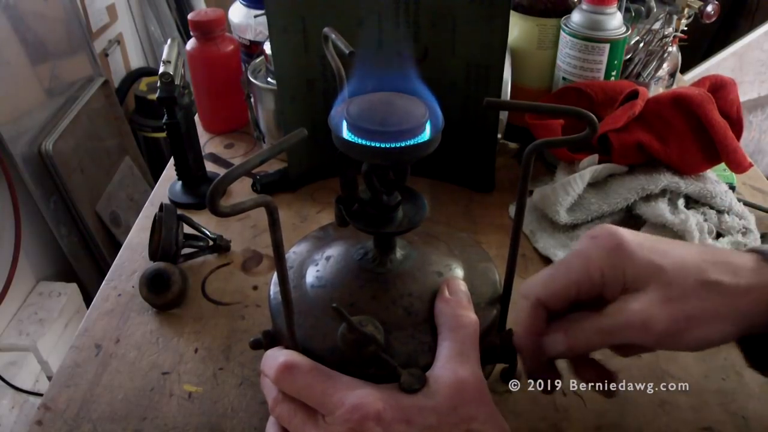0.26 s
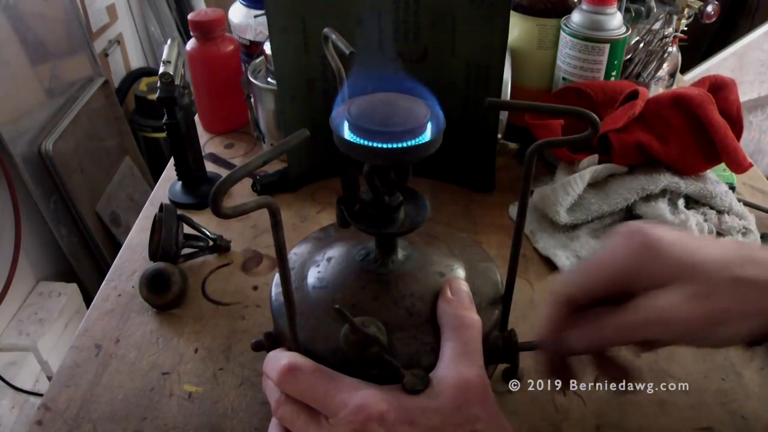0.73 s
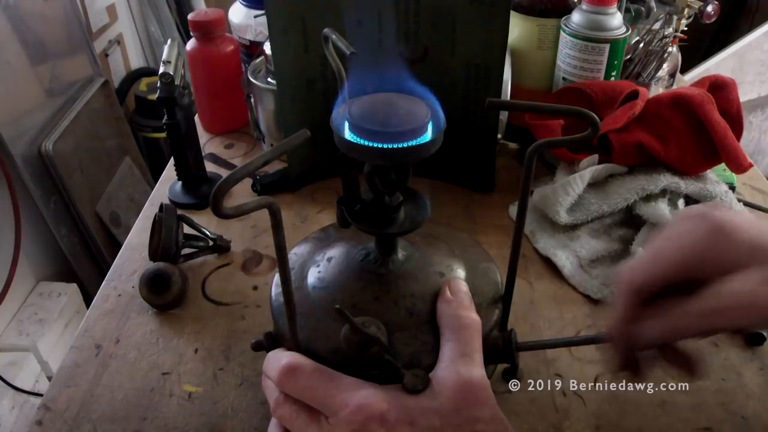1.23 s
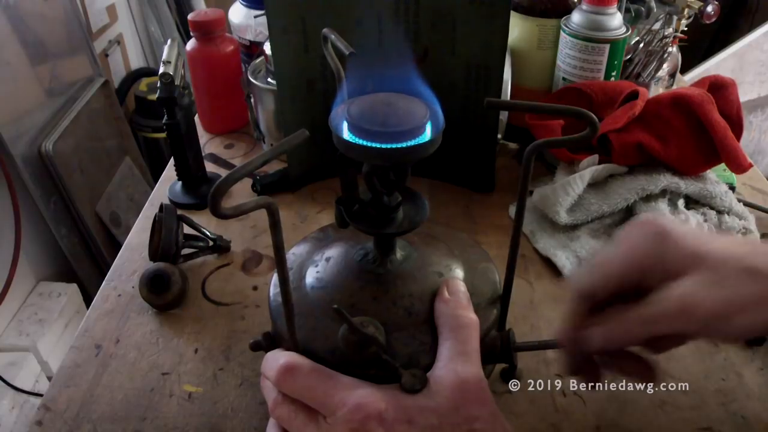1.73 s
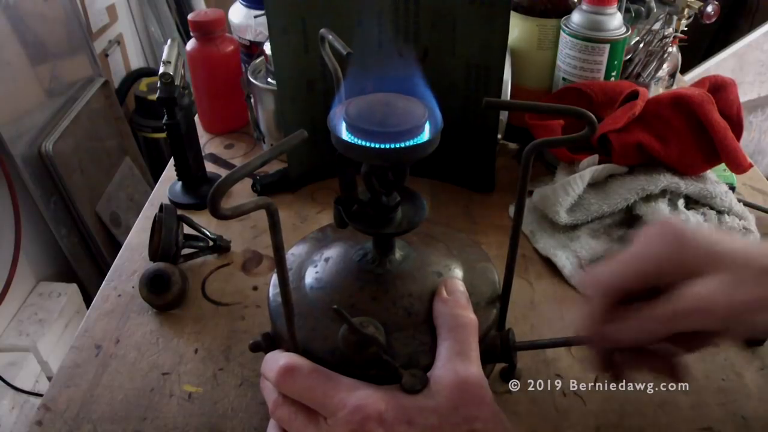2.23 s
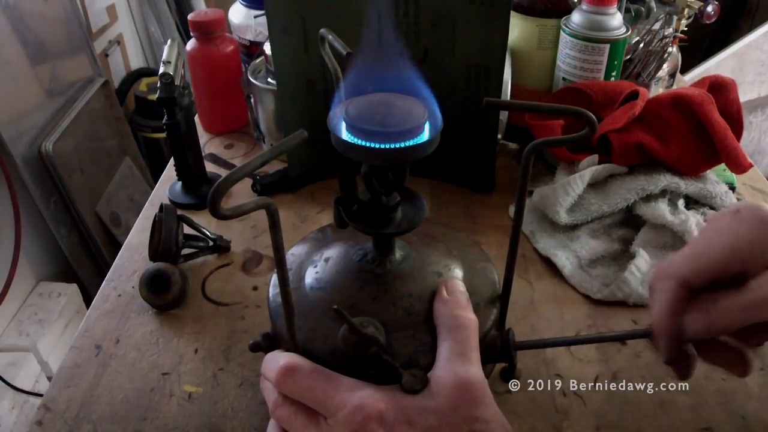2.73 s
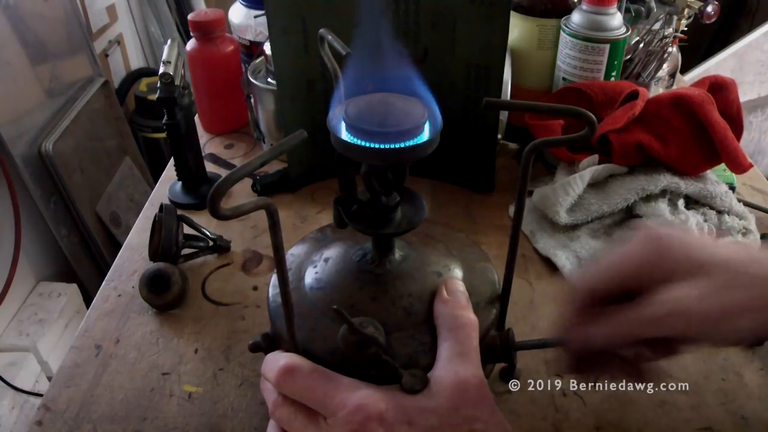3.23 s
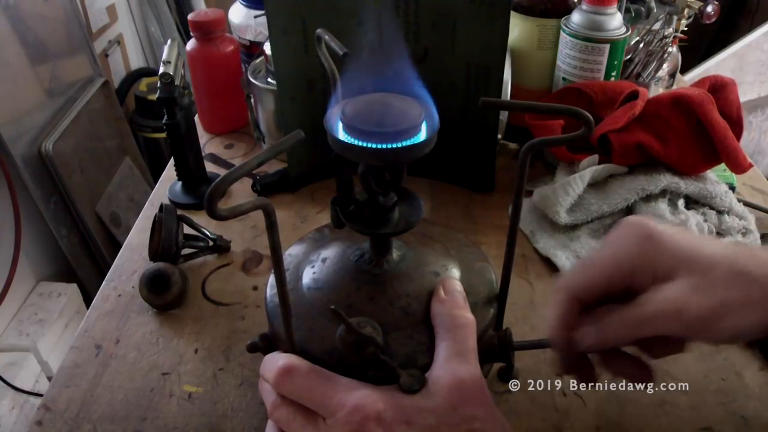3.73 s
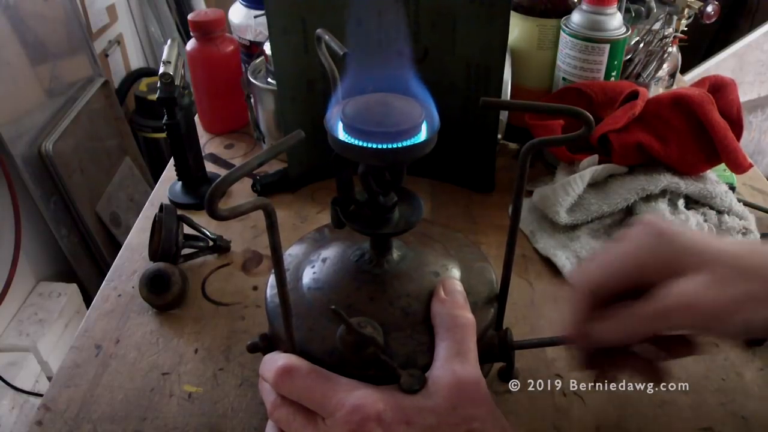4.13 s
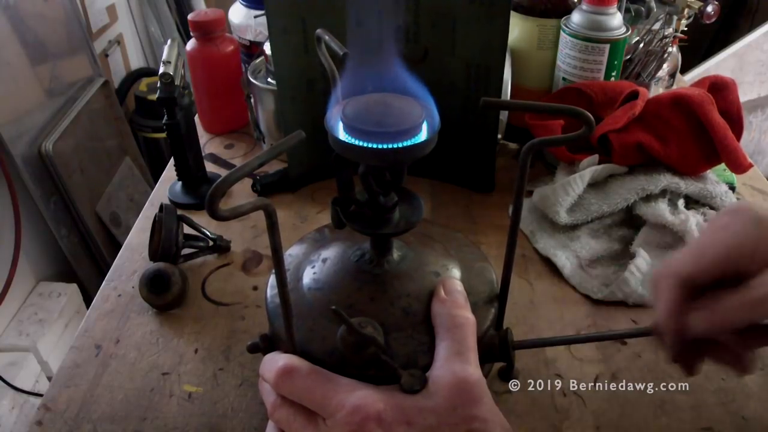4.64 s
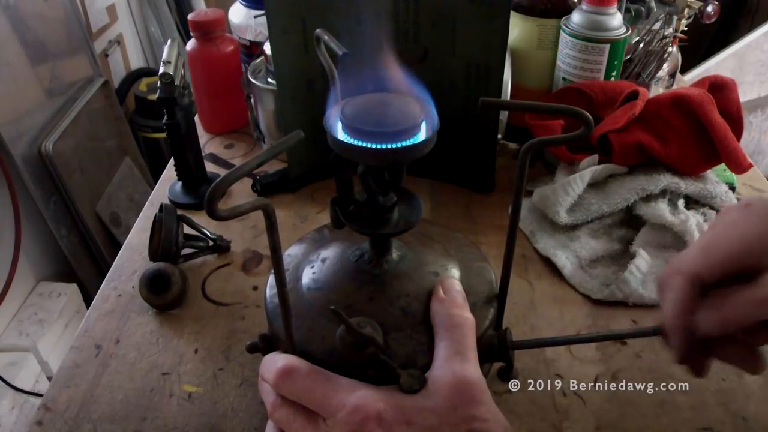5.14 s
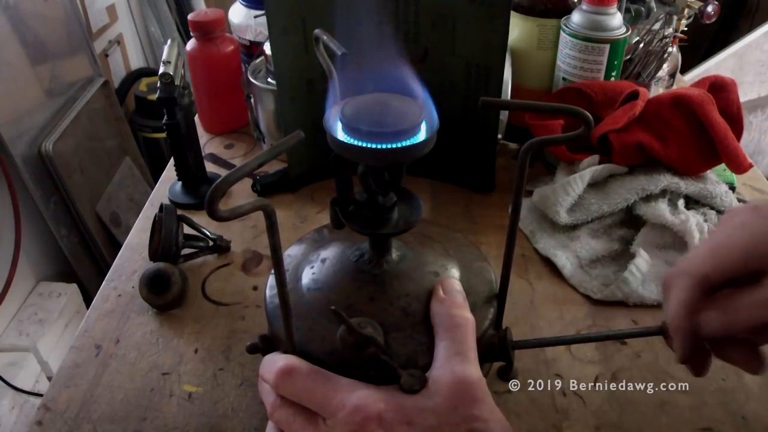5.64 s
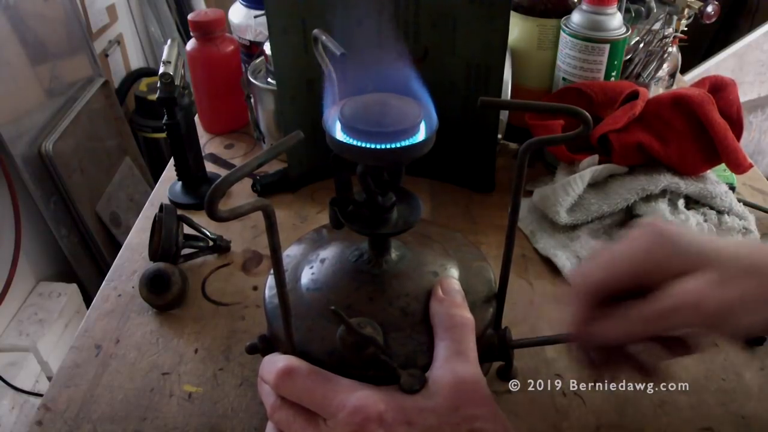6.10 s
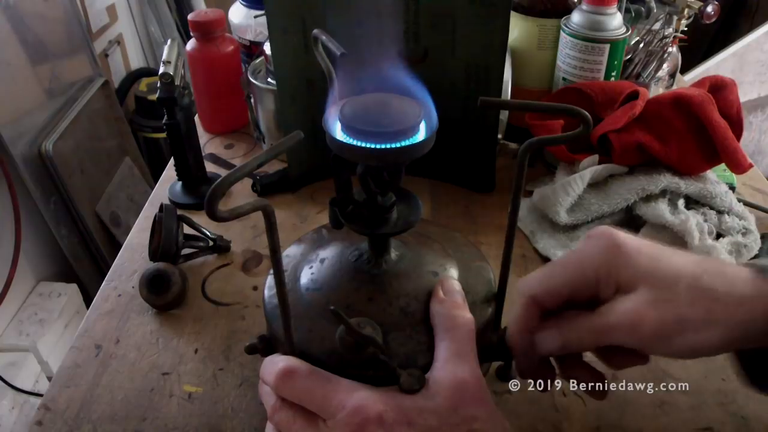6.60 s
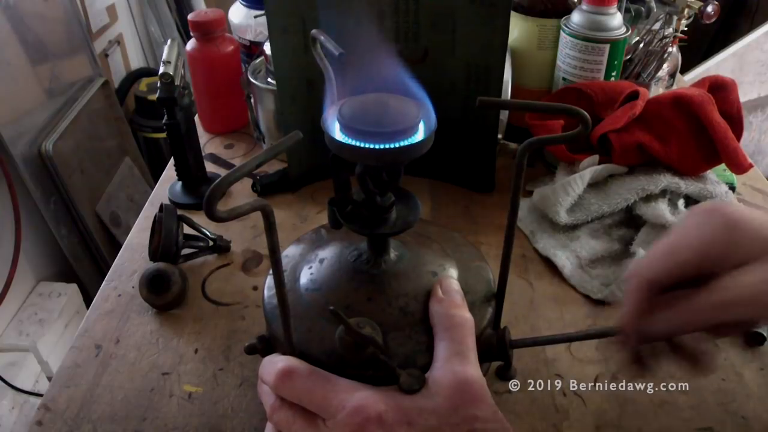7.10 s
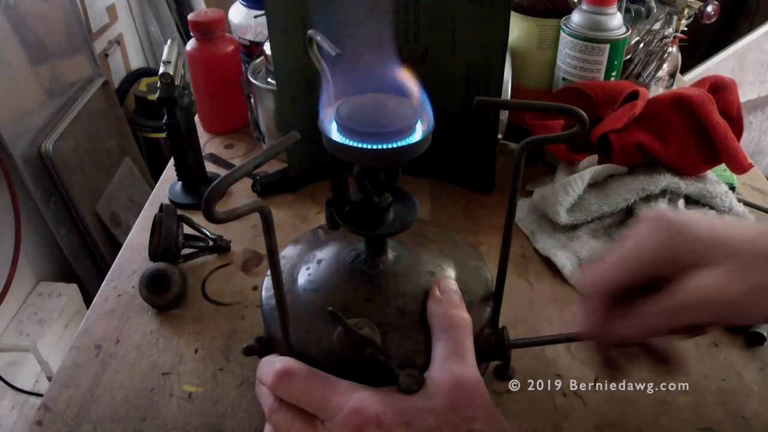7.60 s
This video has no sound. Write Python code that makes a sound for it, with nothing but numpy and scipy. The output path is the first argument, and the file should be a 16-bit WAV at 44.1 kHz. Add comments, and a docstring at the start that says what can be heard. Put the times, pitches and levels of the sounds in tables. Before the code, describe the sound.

A metal pressure stove is pumped by hand, with ringing knocks, bright clicks and light scrapes over a faint burner hiss.

```python
"""A brass pressure stove on a workbench, pumped up in front of one microphone, in mono.
Its silent burner hisses from the start, and the first full strokes end in knocks on the tank.
Then the pumping goes on more lightly: the rod clicks in its cap at each outer turn, the piston taps
and scrapes along the tube, and now and then air gurgles into the fuel. From about 5.5 s the knocks
are heavy again, over a hiss that has grown with the pressure."""
import sys
import numpy as np
from scipy import signal
from scipy.fft import rfft, irfft, next_fast_len
from scipy.io import wavfile
from scipy.ndimage import map_coordinates

SR = 44100
rng = np.random.default_rng(int(sys.argv[2]) if len(sys.argv) > 2 else 0)


def unload_wav(signal):
    """Save mono or channel-first audio to the path in sys.argv[1] as 16-bit WAV at rate SR, clipped to [-1, 1]."""
    wavfile.write(
        sys.argv[1],
        SR,
        np.round(np.clip(np.atleast_2d(signal).T, -1, 1) * 32767).astype(np.int16),
    )


N = 346626


def amp(db):
    """Decibels to gain."""
    return 10 ** (np.asarray(db) / 20)


def wobble(rate_hz):
    """A smooth random curve with rate_hz knots a second."""
    knots = rng.standard_normal(int(N * rate_hz / SR) + 4)
    return map_coordinates(knots, [np.arange(N) * rate_hz / SR])


def filtered(x, response):
    """x through a gain given as a function of frequency."""
    size = next_fast_len(len(x) + 8192)
    return irfft(rfft(x, size) * response(np.fft.rfftfreq(size, 1 / SR)), size)[:len(x)]


def colour(x, spectrum):
    """x shaped by (freq_hz, level_db) points, at rms 1."""
    freq_hz, level_db = np.transpose(spectrum)
    shaped = filtered(x, lambda hz: amp(np.interp(np.log(hz + 1), np.log(freq_hz), level_db)))
    return shaped / np.sqrt(np.mean(shaped ** 2) + 1e-20)


def band(x, low_hz, high_hz):
    """A causal band-pass."""
    return signal.sosfilt(signal.butter(4, [low_hz, high_hz], "band", fs=SR, output="sos"), x)


def at_level(x, db):
    """A short sound scaled to db rms over its first 25 ms."""
    head = x[:SR // 40]
    return amp(db) * x / np.sqrt(np.mean(head ** 2) + 1e-20)


def add(out, start_s, x):
    """Mix x into out from start_s on."""
    start = round(start_s * SR)
    x = x[max(-start, 0):max(len(out) - start, 0)]
    out[max(start, 0):][:len(x)] += x


def ping(t, hz, t60, spread, count):
    """A tight cluster of modes around hz that one contact happens to favour."""
    pitch_hz = hz * (1 + spread * rng.standard_normal((count, 1)))
    phase = rng.uniform(0, 2 * np.pi, (count, 1))
    modes = np.sin(2 * np.pi * pitch_hz * t + phase).sum(0)
    return modes * amp(-0.5 - 60 * t / t60) * np.sqrt(2 / count)


# Peaks and notches where the microphone stands: centre_hz, width_hz, gain_db
BENCH_BANDS = [(721, 10.6, -28), (938, 19, 3), (1025, 8.7, -8), (1192, 30, -4.5), (1460, 19, -17.5),
               (1577, 52, 4), (1960, 9, 8), (2083, 6, 5.5), (2386, 30, -3), (2668, 14.6, -22),
               (3003, 13, -8.5), (3260, 190, 3), (3720, 39, -8), (4190, 11, 2), (4360, 130, -3.5),
               (4940, 250, -6.5), (5870, 17, 9.5), (6300, 18, 7), (6780, 57, -6), (7130, 64, 6),
               (7200, 63, -4), (7905, 25, 7), (8140, 25, 6), (8900, 26, -2.5), (8800, 28, 4.5),
               (9080, 61, 5.5), (9250, 45, -2)]

def bench_reflections(x):
    """Reflections off the bench and nearby things lift and cancel bands on the way to the microphone."""
    size = next_fast_len(N + SR // 2)
    hz = np.fft.rfftfreq(size, 1 / SR)
    db = sum(gain * np.exp(-0.5 * ((hz - centre) / width) ** 2) for centre, width, gain in BENCH_BANDS)
    # folding the cepstrum makes the filter causal
    cepstrum = irfft(np.log(amp(db)), size)
    cepstrum[1:size // 2] *= 2
    cepstrum[size // 2 + 1:] = 0
    return irfft(rfft(x, size) * np.exp(rfft(cepstrum)), size)[:N]


# The low flutter of the flame and the workshop around it: freq_hz, density_db
FLAME_SPECTRUM = [(10, 2.5), (30, 1.5), (58, -4), (85, -12.5), (130, -8), (195, -10.5), (250, -7.5),
                  (330, -12), (450, -17.5), (750, -15.5), (1300, -32), (3000, -71)]
# The vapour jet inside the burner cap: freq_hz, density_db
JET_SPECTRUM = [(600, -10.5), (950, -9.5), (1200, -15), (1430, -20), (1650, -15.5), (2400, -6), (3300, -6),
                (4950, -2), (5700, -0.5), (6800, -1), (8100, 0.5), (9100, 0.5), (9800, -10.5), (11500, -14),
                (13600, -14), (15200, -25.5)]

def burner(start_db=-49.35, db_per_run=0.2916):
    """The vapour jet hisses through the cap above the flame's soft flutter; both grow with pressure."""
    run_times_s = [tap_s for tap_s, _ in PISTON_RUNS]
    runs_done = np.interp(np.arange(N) / SR, run_times_s, np.arange(len(PISTON_RUNS)))
    jet_db = start_db + db_per_run * runs_done
    flame_db = -55 + 0.5 * (jet_db - jet_db.mean())
    jet = colour(rng.standard_normal(N), JET_SPECTRUM)
    flame = colour(rng.standard_normal(N), FLAME_SPECTRUM)
    return amp(jet_db + 0.49 * wobble(12)) * jet + amp(flame_db + 2 * wobble(7.5)) * flame


# Air bubbling into the fuel, inside the tank: start_s, relative_db, pitch_hz
AIR_GULPS = [(.395, -63, 337), (.89, -60.5, 392), (1.75, -59.5, 341), (3.41, -61.5, 429), (4.162, -56, 523),
             (7.51, -58, 405)]

def gurgles(t60=0.13, spread=0.279, glide_per_s=1.3, count=9):
    """Each gulp of air is a small cluster of bubbles whose pitch rises."""
    out, t = np.zeros(N), np.arange(SR // 4) / SR
    for start_s, db, hz in AIR_GULPS:
        age = np.maximum(t - np.linspace(0, 0.016, count)[:, None], 0)
        pitch_hz = hz * np.exp(spread * rng.standard_normal((count, 1)))
        envelope = amp(-60 * age / t60) * (1 - np.exp(-age / 0.00037))
        bubbles = envelope * np.sin(2 * np.pi * pitch_hz * age * (1 + glide_per_s * age))
        add(out, start_s, at_level(bubbles.sum(0), db + 9))
    return out


# The piston runs along the pump tube, catching once with a light tap: tap_s, relative_db
PISTON_RUNS = [(0.8, -56.5), (1.384, -55), (1.839, -53), (2.196, -56), (2.475, -53.5), (2.86, -55.5),
               (3.111, -63), (3.29, -61.5), (3.671, -58.5), (4.097, -53), (4.474, -55.5), (4.828, -55),
               (5.321, -52.5), (5.86, -55), (6.49, -55), (6.9, -62), (7.22, -53)]

def piston_scrapes(run_s=0.18, lead_s=0.044, slips_per_s=55, slip_t60=0.13, scatter_db=4, gain_db=2):
    """In every run the piston sticks and slips at uneven moments, and the tank answers each slip."""
    t, force = np.arange(N) / SR, np.zeros(N)
    for tap_s, db in PISTON_RUNS:
        position = 2 * (t - tap_s + lead_s) / run_s - 1  # -1 to 1 along the run
        force += amp(db) * np.sqrt(np.clip(1 - position ** 2, 0, 1))
    slips = (rng.random(N) < slips_per_s / SR) * amp(scatter_db * rng.standard_normal(N))
    slip_decay = amp(-60 * t[:SR // 4] / slip_t60)
    power = signal.fftconvolve(slips ** 2, slip_decay ** 2)[:N]
    friction = rng.standard_normal(N) * np.sqrt(np.abs(power))
    tank_spectrum = [(150, -1), (350, -9), (700, 1.5), (950, 2.5), (1420, -16), (1700, 3), (2200, -1),
                     (3300, -10), (5000, -11.5), (12000, -45)]
    return amp(gain_db) * force * colour(friction, tank_spectrum)


# Modes of the tank, legs and burner, the tank's boom first: pitch_hz, level_db, t60_s
BRASS_MODES = [(894, 2.5, 0.33), (347, -3, 0.31), (586, -15.5, 0.59), (679, -4.5, 0.18), (1090, 1.5, 0.08),
               (1220, 9.5, 0.019), (1650, -7, 0.44), (1760, -6, 0.074), (2010, -11.5, 0.18),
               (2050, 0.5, 0.22), (2150, -7, 0.48), (2294, 1, 0.12), (2753, -3, 0.44), (2850, -5, 0.26),
               (3077, 7.5, 0.11), (3540, 1, 0.25), (4060, -16, 0.12), (4450, -20, .15), (8076, 10, 0.18),
               (8600, -7, 0.12), (8970, 8.5, 0.1), (9080, -2, 0.075)]
# The crowd of short-lived modes between them: freq_hz, density_db
CLATTER_SPECTRUM = [(120, -7), (330, -10), (520, -4.5), (750, -0.5), (950, 0), (1100, -3), (1250, -7.5),
                    (1420, -10.5), (1620, 0), (2200, 2.5), (2600, -3.5), (3200, 2.5), (4900, 1.5),
                    (6200, -0.5), (7600, -0.5), (9100, -2.5), (9700, -6), (12000, -16), (15000, -30)]

def strike(levels_db, edges_hz, pings, rise_s, hold_s, chatter_t60, modes_db, t60_scale,
           room_db, room_t60):
    """One metal contact: a snap, a brief chatter, the ringing modes and the workshop's answer."""
    t = np.arange(SR // 2) / SR
    onset = 1 - np.exp(-t / rise_s)
    # bench and nearby things keep the chatter up for a few milliseconds
    chatter = amp(-60 * np.maximum(t - hold_s, 0) / chatter_t60)
    room = amp(room_db - 60 * t / room_t60)
    wash = colour(rng.standard_normal(len(t)), CLATTER_SPECTRUM) * np.hypot(chatter, room)
    pitch_hz, level_db, t60 = np.transpose(BRASS_MODES)[:, :, None]
    struck_db = level_db + modes_db + rng.normal(0, 1.55, pitch_hz.shape)
    phase = rng.uniform(0, 2 * np.pi, pitch_hz.shape)
    envelopes = amp(struck_db - 60 * t / (t60 * t60_scale))
    ring = np.sum(envelopes * np.sin(2 * np.pi * pitch_hz * t + phase), axis=0)
    snap = amp(-6.5 - 60 * t / 0.014) * rng.standard_normal(len(t))
    blow = onset * (wash + ring + pings) + snap
    # the point of contact decides how strongly each register speaks
    registers = zip(levels_db, edges_hz, edges_hz[1:])
    return sum(at_level(band(blow, low, high), db) for db, low, high in registers)


# Borders of a click's ring, clank, tick and tink registers: edge_hz
CLICK_EDGES = [1400, 2600, 4900, 7600, 15500]
# The rod meets the pump cap: start_s, relative_db, brightness_db, note_hz, note_over_level_db
ROD_CLICKS = [(0.5075, -32.5, 2, 2020, -5), (0.761, -43, -7.5, 2210, -2), (1.181, -32, -2.5, 1974, -4),
              (1.697, -32.5, 7.5, 3740, 1), (2.0938, -32.5, -5, 4430, -8), (2.429, -37.5, 16, 3680, 7),
              (2.5574, -42.5, 8, 2000, -6), (2.8014, -36.5, -6, 4020, .5), (3.1928, -38.5, -5.5, 4200, -4),
              (3.5695, -40, -1, 4580, 0.5), (3.979, -31.5, 4, 4000, -4.5), (4.3265, -37, 5, 4380, -5.5),
              (4.7183, -33.5, -5.5, 3600, -5), (5.2105, -30.5, 6.5, 4330, -3), (5.6432, -37, -2, 4680, -10),
              (6.259, -31.5, -5.5, 1920, -5.5), (6.9773, -36.5, -1, 2026, -3),
              (7.239, -44.5, -5, 4120, 5.5), (7.7159, -36, -0.5, 1947, -5.5)]

def rod_clicks(tick_hz=6310, tink_hz=8760, thud_db=-18, idle_ring_db=-12.5, idle_clank_db=-9):
    """Light, bright contacts: a note of their own under the rod's two high ones, and a faint thud."""
    out, t = np.zeros(N), np.arange(SR // 2) / SR
    edges_hz = KNOCK_EDGES[:1] + CLICK_EDGES  # the tank's thud lies below the other registers
    for start_s, db, bright_db, note_hz, note_db in ROD_CLICKS:
        pings = amp(-2.5) * ping(t, note_hz, t60=0.16, spread=0.04, count=9)
        pings += amp(-7) * ping(t, tick_hz, t60=0.11, spread=0.031, count=7)
        pings += amp(2) * ping(t, tink_hz * (1 + rng.normal(0, 0.0181)), t60=0.1, spread=0.022, count=7)
        # the register that holds the note speaks up
        middle_db = [note_db, idle_clank_db] if note_hz < CLICK_EDGES[1] else [idle_ring_db, note_db]
        levels_db = db + np.array([thud_db, *middle_db, -bright_db / 2, bright_db / 2])
        click = strike(levels_db, edges_hz, pings, rise_s=0.00036, hold_s=0.003, chatter_t60=0.083,
                       modes_db=-22, t60_scale=1, room_db=-5.5, room_t60=0.26)
        add(out, start_s, click)
    return amp(-2.5) * out


# Borders of a knock's thud, ring, clank and crack registers: edge_hz
KNOCK_EDGES = [200, 1150, 2600, 4900, 15500]
# Colour of the piston's tap: ring_over_blow_db, crack_over_blow_db, squareness (0-1)
TAP_COLOUR = (5.7, -1, 0.1)
# The rod hits the tank: start_s, blow_db, ring_over_blow_db, crack_over_blow_db, squareness (0-1)
TANK_KNOCKS = [(-0.012, -33.5, 7, 3.5, 0.6), (0.1352, -48.5, 3.5, -4, 0.5), (0.3586, -38.5, 5.5, -8, 0),
               (0.6546, -28, 8, 5, 0.88), (0.9971, -41.5, 6.5, -14, 0.6), (1.43, -49.5, -5, 5, 0.3),
               (1.908, -52, -9, 1, .1), (2.2611, -35.5, -7, 1.5, 0), (2.967, -50, 1.5, 5.5, 0.85),
               (3.393, -48, -5, -5, 1), (4.528, -45.5, -3, -1, 0.6), (5.416, -45.5, -7, .5, 0.1),
               (5.5383, -36, 7, -3.5, 0.22), (5.7966, -33.5, 3.5, -1.5, 0.06), (6.1493, -40, 3.5, -13, 0),
               (6.4126, -34.5, 5, -2.5, 0.74), (6.5629, -40.5, 1, -3, 0), (6.7992, -33, 10.5, -1, 0),
               (7.1488, -34.5, 6, 11.5, 1), (7.3235, -40, -5, -1.5, 0.13), (7.5338, -30.5, 10, 0, 0.2)]

def tank_knocks(ring_hz=2056, thud_db=-3, clank_db=1.5, boom_db=-0.5):
    """Knocks and the piston's taps set the whole tank ringing; a square blow also makes it boom."""
    out, t = np.zeros(N), np.arange(SR // 2) / SR
    boom_hz, _, boom_t60 = BRASS_MODES[0]
    taps = [(*run, *TAP_COLOUR) for run in PISTON_RUNS]
    for start_s, db, ring_db, crack_db, squareness in TANK_KNOCKS + taps:
        boom = ping(t, boom_hz, boom_t60, spread=0.011, count=3) * (1 - np.exp(-t / 0.001))
        pings = amp(-15.5) * ping(t, ring_hz, t60=0.16, spread=0.013, count=5)
        # the thin rod tinkles on after the blow
        pings += amp(-3.5) * ping(t, 8600, t60=0.13, spread=0.045, count=12)
        levels_db = db + np.array([thud_db, ring_db, clank_db, crack_db])
        blow = strike(levels_db, KNOCK_EDGES, pings, rise_s=0.00073, hold_s=0.0069, chatter_t60=0.064,
                      modes_db=-15, t60_scale=0.57, room_db=-12, room_t60=0.4)
        add(out, start_s, blow + squareness * amp(db + boom_db) * boom)
    return amp(-2.42) * out


def scene():
    """The whole stove as it reaches the microphone across the bench, alike in both channels."""
    stove = bench_reflections(tank_knocks() + rod_clicks() + piston_scrapes() + gurgles() + burner())
    return np.array([stove, stove])


def record(dry):
    """The camera keeps nothing above its band limit."""
    limit_hz, fade_hz = 15350, 300
    return np.array([filtered(x, lambda hz: np.clip((limit_hz - hz) / fade_hz + 0.5, 0, 1))
                     for x in dry])


dry = scene()
out = record(dry)
unload_wav(out)
```